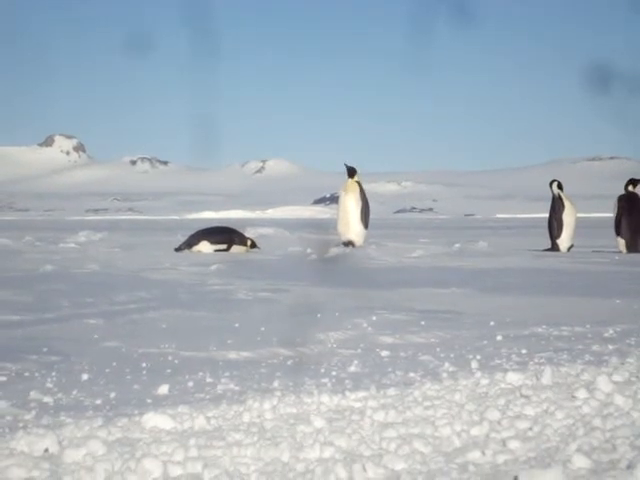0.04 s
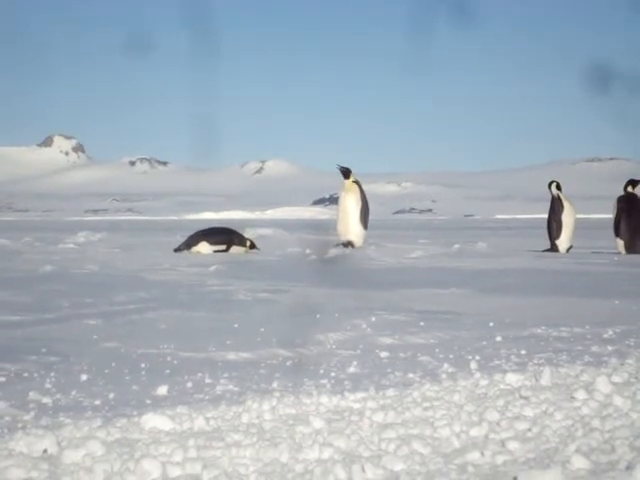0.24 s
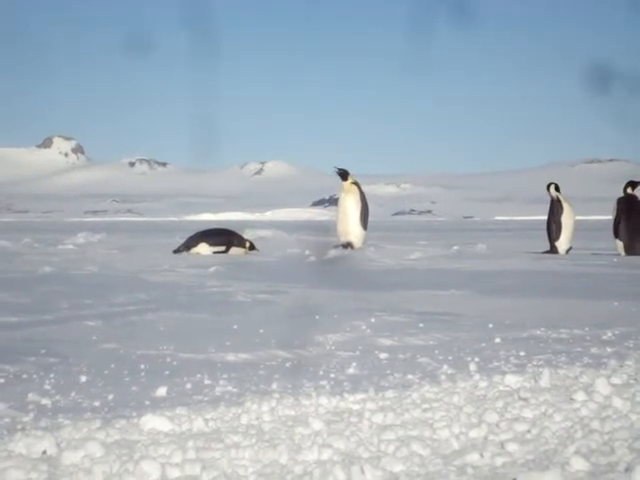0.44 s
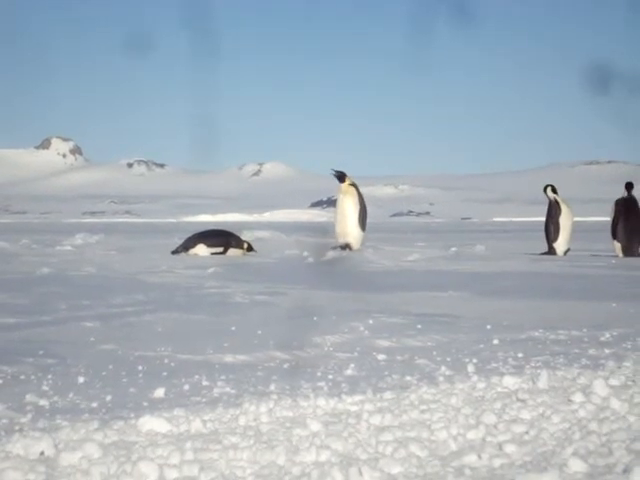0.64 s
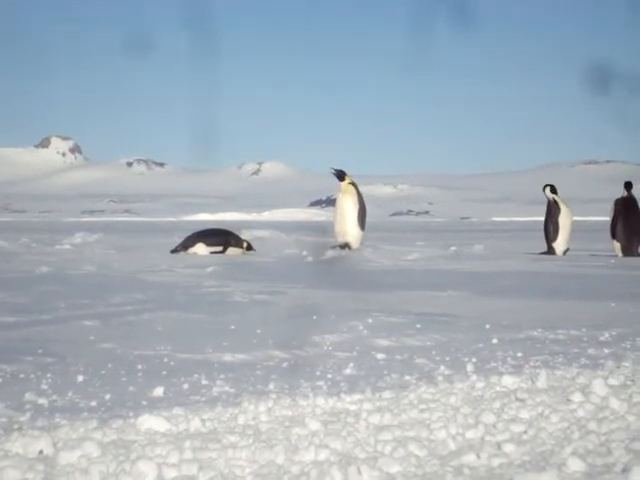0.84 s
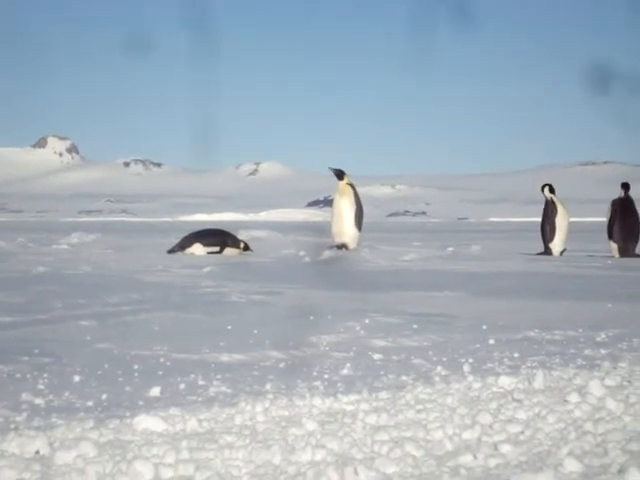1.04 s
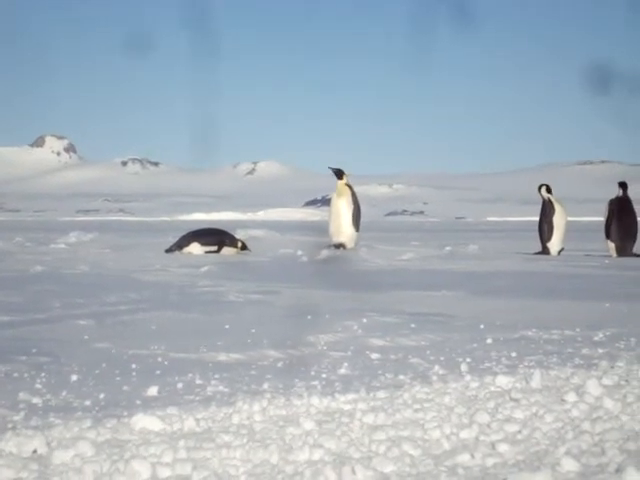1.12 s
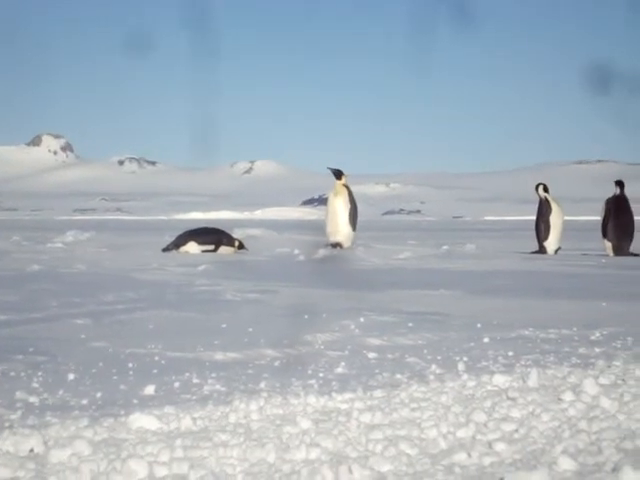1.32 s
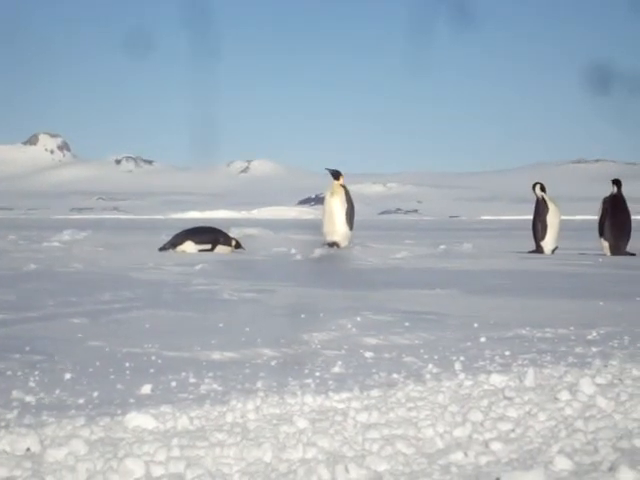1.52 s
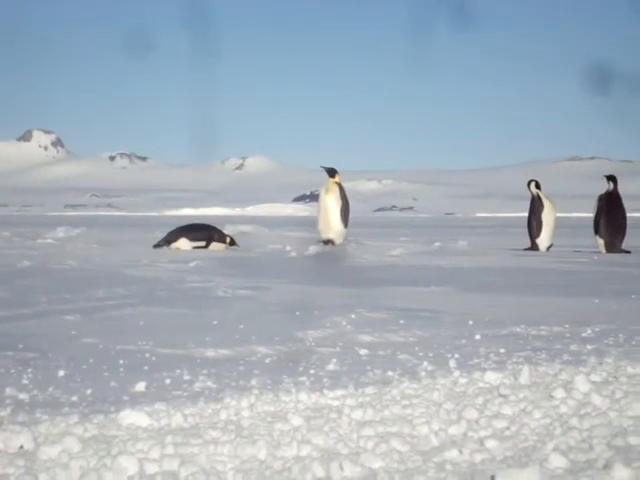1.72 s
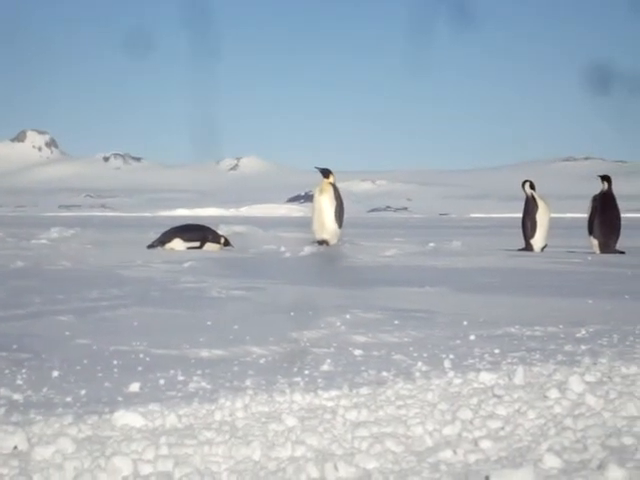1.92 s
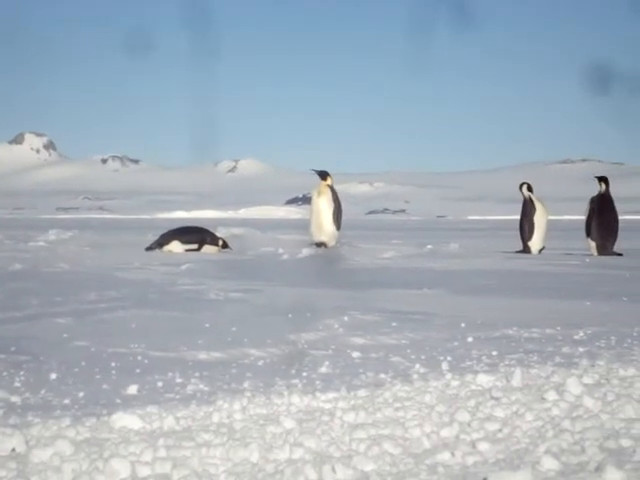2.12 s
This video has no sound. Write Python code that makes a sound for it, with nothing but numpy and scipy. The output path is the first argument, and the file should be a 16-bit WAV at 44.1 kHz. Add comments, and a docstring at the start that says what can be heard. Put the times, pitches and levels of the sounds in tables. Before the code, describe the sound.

A single harsh penguin bleat starts weak and breathy, swells into a buzzing two-voiced blare, then falls and ends in small creaks; open snowy ice, faint steady wind and microphone hiss, almost no echo.

```python
"""A large penguin on open ice gives one harsh bleat over a faint, steady hiss of wind.
The call sets in weak and breathy and rises on two membrane voices about a minor third apart, which pull on
each other through modulation of timing and size; a high rasp rings briefly. In mid call the pitch curves
lock six cycles to five, then slip apart, fall and end in a few creaks, each a click with a noisy puff.
Throat resonances glide as the call opens and closes, and the rough ice adds a short diffuse scatter."""
import sys
import numpy as np
from scipy import signal
from scipy.fft import rfft, irfft, next_fast_len
from scipy.io import wavfile
from scipy.ndimage import uniform_filter1d, map_coordinates

SR = 44100
rng = np.random.default_rng(int(sys.argv[2]) if len(sys.argv) > 2 else 0)


def store_wav(level_fs):
    """Save 16-bit WAV to argv[1]."""
    pcm = np.round(np.clip(np.atleast_2d(level_fs), -1, 1) * 32767)
    wavfile.write(sys.argv[1], SR, pcm.T.astype(np.int16))


def voltage_ratio(decibels):
    """Convert decibels (scalar or array-like) to amplitude ratios, 20 dB per decade."""
    exponent = np.asarray(decibels, float) / 20
    return 10 ** exponent


N = 94815
TIME_S = np.arange(N) / SR


def unit(x):
    """Normalisation: scale to rms 1."""
    return x / np.sqrt(np.mean(x ** 2) + 1e-20)


def curves(rows, smooth=1):
    """Linear interpolation: one value per sample for each column after t/s, averaged over smooth samples."""
    s, *columns = np.transpose(rows)
    return [uniform_filter1d(np.interp(TIME_S, s, column), size=smooth) for column in columns]


def wobble(rate):
    """Band-limited fluctuation: a smooth random curve through rate knots a second (900 at most)."""
    knots = rng.standard_normal(2000)
    return map_coordinates(knots, [np.arange(N) * min(rate, 900) / SR])


def coloured(x, points):
    """Minimum-phase filtering: the folded cepstrum gives a causal filter with the gain of f/Hz, level/dB."""
    m = 2 ** 17
    f, db = np.transpose(points)
    log_f = np.log(np.fft.rfftfreq(m, 1 / SR) + 1)
    log_gain = np.interp(log_f, np.log(f), db) * np.log(10) / 20
    cepstrum = irfft(log_gain, m)
    cepstrum[1:m // 2] *= 2
    cepstrum[m // 2 + 1:] = 0
    return irfft(rfft(x, m) * np.exp(rfft(cepstrum)), m)[:N]


# Effort of the call: t/s, source level/dB ahead of the throat's glide, low voice gain over high/dB
EFFORT = [(.1, -91, -6), (.118, -62, -12), (.135, -59, -9), (.155, -47.5, 6.5), (.163, -45, -0.5),
          (.172, -38, 3.5), (.21, -37, 5.5), (.228, -27, -7.5), (.248, -30, -6), (.265, -28, -4),
          (.33, -25.5, 0.5), (.5, -22, -1), (.68, -21.5, -1.5), (.85, -21.5, -3), (.97, -22.5, -5),
          (1.05, -28, 0), (1.114, -33, -1), (1.155, -35.5, -8.5), (1.163, -53, 5), (1.174, -39.5, -4),
          (1.19, -62, -17), (1.24, -55, -19.5)]


def bleat():
    """Source-filter principle: two coupled voices, breath and creaks excite the throat; low tones join after."""
    level_db, low_db = curves([*EFFORT, (1.28, -90, 0)])  # the added last row fades to silence
    high_hz, low_hz, high, low = membrane_phases()
    pair = coupled_pair(high_hz, low_hz, high, low, low_db)
    both = unit(pair) + combination_tones(high, low) + breath(high, low)
    source = both * voltage_ratio(level_db) * (TIME_S > EFFORT[0][0])
    # the steady source through the open throat, in mid call, sets the reference level
    reference = np.std(coloured(both, THROAT_OPEN)[SR // 2:SR * 3 // 4])
    add_creaks(source)
    return throat(source) / reference + first_partials(high, low)


# Pitch: t/s, high voice f/Hz, low voice f/Hz
PITCH = [(.13, 360, 305), (.2, 420, 352), (.244, 444, 377), (.3, 487, 407), (.36, 515, 427.5),
         (.42, 530, 441.67), (.48, 540.6, 450.5), (.57, 548.4, 457), (.64, 548.4, 457), (.69, 545.3, 450.2),
         (.78, 539.2, 440), (.87, 526.4, 425), (.93, 514, 413.8), (.99, 485, 399), (1.05, 443, 369),
         (1.11, 389, 313), (1.17, 325, 270), (1.25, 270, 235)]
# Irregularity: t/s, timing jitter/rad (multiplies a random curve), breath level re the voice pair/dB
ROUGH = [(.12, .3, -6), (.17, .05, -19), (.45, .03, -22), (.63, .025, -23), (.68, .03, -22),
         (1.0, .035, -21), (1.12, .05, -19), (1.2, .1, -15)]


def membrane_phases():
    """Phase is the integral of frequency: each membrane's running phase, with its own random jitter."""
    high_hz, low_hz = curves(PITCH, smooth=2001)
    jitter, _ = curves(ROUGH)
    jitter_rate = 260  # knots per second
    high, low = (2 * np.pi * np.cumsum(f) / SR + jitter * wobble(jitter_rate) for f in (high_hz, low_hz))
    low_lead = .104  # rad
    return high_hz, low_hz, high, low + low_lead


# Pull of one membrane on the other: timing/rad, its lag/rad, share of size, its lag/rad,
# timing at twice the rate/rad, its lag/rad
PULL_HIGH = (.237, 2.474, .325, 3.043, .097, 3.987)
PULL_LOW = (.162, -.097, .282, .404, .014, 1.19)


def coupled_pair(high_hz, low_hz, high, low, low_db):
    """Mutual modulation: each membrane is pulled by the other's phase; both shimmer in level."""
    shimmer_db = 0.7  # multiplies a random curve
    # second pulse as a membrane opens: (share of the first, delay in rad); smear in rad
    high_voice = voice(high, low, PULL_HIGH, reopen=(.237, 3.348), smear=.028, hz=high_hz)
    low_voice = voice(low, high, PULL_LOW, reopen=(.084, 2.183), smear=.022, hz=low_hz)
    high_part = high_voice * voltage_ratio(shimmer_db * wobble(89.9))
    low_part = low_voice * voltage_ratio(low_db + shimmer_db * wobble(90.1))
    return high_part + low_part


def voice(phase, other, pull, reopen, smear, hz, count=36):
    """Fourier synthesis: pulses summed from overtones, their timing and size modulated by the other membrane."""
    timing, timing_lag, size, size_lag, double, double_lag = pull
    shifted = phase + timing * np.sin(other + timing_lag) + double * np.sin(2 * other + double_lag)
    share, delay = reopen
    pulses = 0
    for k in range(2, count):
        late = shifted - smear * k  # higher overtones arrive later
        overtone = np.cos(k * late) + share * np.cos(k * (late - delay))
        pulses = pulses + (k * hz < 12000) * overtone
    effort = np.sqrt(hz / hz.max())  # weaker at lower pitch
    return pulses * effort * (1 + size * np.cos(other + size_lag))


def combination_tones(high, low):
    """Intermodulation: the sum tone, and the tone at three times the high voice less the low voice."""
    return voltage_ratio(-20.5) * np.cos(high + low) + voltage_ratio(-34.5) * np.cos(3 * high - low)


def breath(high, low):
    """Amplitude-modulated turbulence: noise gated by both membranes' cycles over a steady part."""
    _, breath_db = curves(ROUGH)
    steady = 1.2  # share that the cycles do not gate
    gate = steady + np.cos(high) + np.cos(low)
    return unit(rng.standard_normal(N) * gate) * voltage_ratio(breath_db)


# First partials: t/s, high voice rms level/dB, low voice rms level/dB
FIRST = [(.13, -95, -95), (.17, -63, -62), (.24, -59, -62), (.33, -51, -60), (.52, -46.5, -57),
         (.72, -47, -58), (.87, -50, -61), (.99, -56, -62), (1.08, -62, -63), (1.18, -64, -66),
         (1.26, -90, -90)]


def first_partials(high, low):
    """Pure tones: each membrane's clean fundamental, added past the throat."""
    high_db, low_db = curves(FIRST)
    return np.sqrt(2) * (voltage_ratio(high_db) * np.cos(high) + voltage_ratio(low_db) * np.cos(low))


# Closing creaks: t/s, relative level/dB
CREAKS = [(1.185, -42), (1.191, -41), (1.199, -37), (1.2145, -37), (1.233, -41), (1.243, -45)]


def add_creaks(source):
    """Impulse excitation: each creak is one click with a decaying puff of noise, added to the source in place."""
    raise_db, puff_db, t60_s = 15, -26, .045  # gain of every creak, puff re click, puff decay time
    t = np.arange(SR // 20) / SR
    for s, db in CREAKS:
        puff = voltage_ratio(puff_db) * rng.standard_normal(len(t)) * voltage_ratio(-60 * t / t60_s)
        source[round(s * SR):][:len(t)] += voltage_ratio(db + raise_db) * ((t == 0) + puff)


# Windpipe and beak at the start, open and at the end of the call: f/Hz, level/dB
THROAT_START = [(150, -48.5), (350, -19), (650, -5.5), (1000, -7), (1750, -11.5), (2200, 7), (2700, -17.5),
                (3680, -4.5), (4400, -18), (5400, -32.5), (6200, -21.5), (7400, -40), (8700, -21),
                (10500, -45.5), (22000, -85)]
THROAT_OPEN = [(150, -50.5), (430, -30.5), (640, -18), (790, -6), (900, -4), (1090, 0), (1350, -3.5),
               (1750, -6), (2000, -2.5), (2220, -1), (2400, 3), (2680, 1.5), (2950, -3.5), (3300, -2),
               (3680, 0), (4050, -4), (4560, -4.5), (5000, -12.5), (5800, -21.5), (6300, -34), (6800, -29),
               (7700, -48), (8400, -35), (9000, -41.5), (9500, -28.5), (10500, -59), (22000, -56)]
THROAT_END = [(150, -62), (320, -13), (700, -11), (1200, 2), (1750, -6), (2100, -1), (2450, 0.5),
              (3100, -10), (3950, -4.5), (4700, -22.5), (5700, -22.5), (6400, -21.5), (7500, -33),
              (22000, -55)]


def throat(x):
    """Resonance: crossfaded filters glide from starting to open to closing shape; a high one rings briefly."""
    start, = curves([(0.14, 1), (0.49, 0)])
    end, = curves([(1, 0), (1.146, 1)])
    shaped = start * coloured(x, THROAT_START)
    shaped += (1 - start - end) * coloured(x, THROAT_OPEN)
    shaped += end * coloured(x, THROAT_END)
    rasp_hz, middle_s, half_length_s, rasp_db = 6200, .345, .06, -12
    rasp = signal.filtfilt(*signal.iirpeak(rasp_hz, 20, SR), x)
    rasp *= np.exp(-((TIME_S - middle_s) / half_length_s) ** 2)
    return shaped + voltage_ratio(rasp_db) * rasp


def ice(x):
    """Diffuse scattering: convolution with exponentially decaying noise, as from rough ice."""
    echo_db, t60_s = -20, .15  # tail energy re direct sound, decay time
    t = np.arange(SR // 3) / SR
    tail = rng.standard_normal(len(t)) * voltage_ratio(-60 * t / t60_s) * (t > .004)
    tail /= np.linalg.norm(tail)
    return x + voltage_ratio(echo_db) * signal.fftconvolve(x, tail)[:N]


# Relative spectral density of the hiss: f/Hz, level/dB per Hz
HISS = [(15, -60), (25, -18.5), (118, -5.5), (141, -3), (322, -2), (365, 0), (10000, -8), (13000, -65),
        (22000, -120)]


def hiss():
    """Filtered random noise: faint wind and microphone hiss, swelling a little."""
    level_db = -60 + 0.34 * wobble(5.5)
    return unit(coloured(rng.standard_normal(N), HISS)) * voltage_ratio(level_db)


def scene():
    """Superposition: the bleat with its scatter off the ice, and the hiss."""
    return (ice(bleat()) + hiss())[None]


def low_pass(x):
    """Removes everything above the highest recorded frequency."""
    return signal.sosfilt(signal.butter(12, 10150, fs=SR, output="sos"), x)


def record(dry):
    """Band limitation: nothing passes from top_hz upward."""
    top_hz = 10160
    m = next_fast_len(N)
    passed = np.fft.rfftfreq(m, 1 / SR) < top_hz
    mix = irfft(rfft(dry, m) * passed, m)[..., :N]
    return low_pass(mix)


dry = scene()
out = record(dry)
store_wav(out)
```